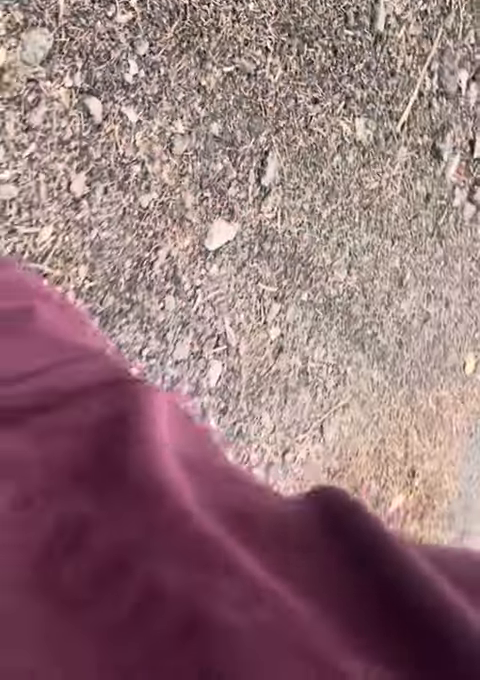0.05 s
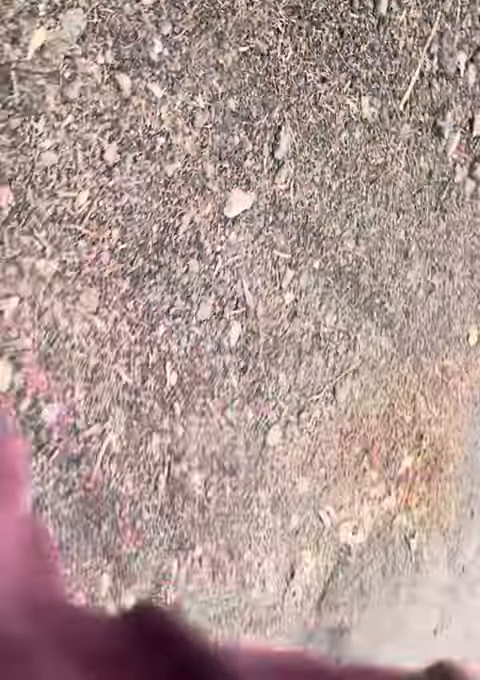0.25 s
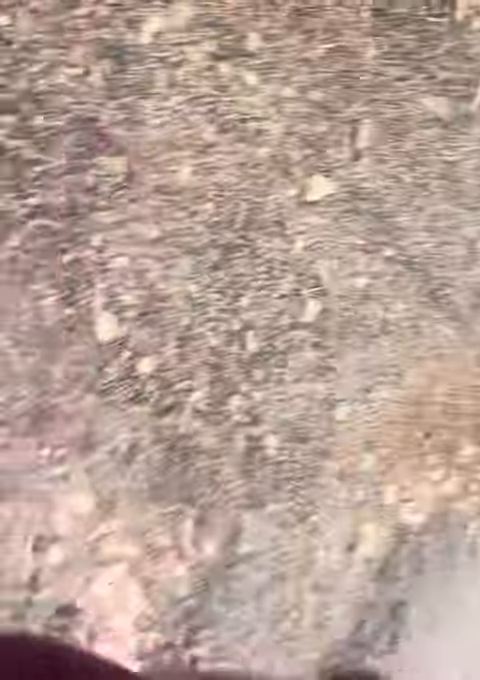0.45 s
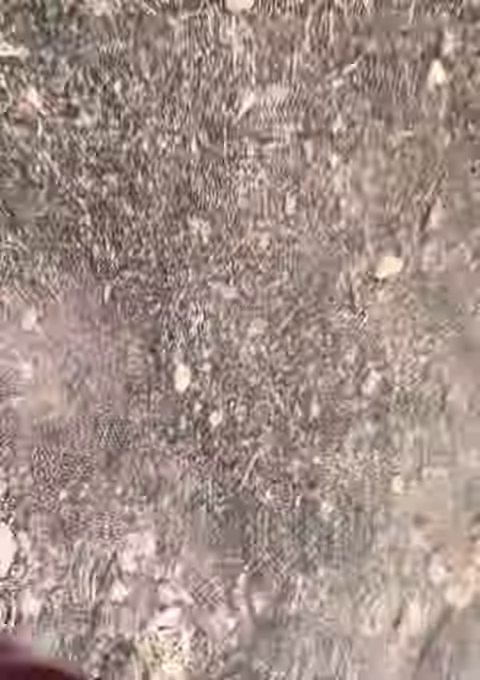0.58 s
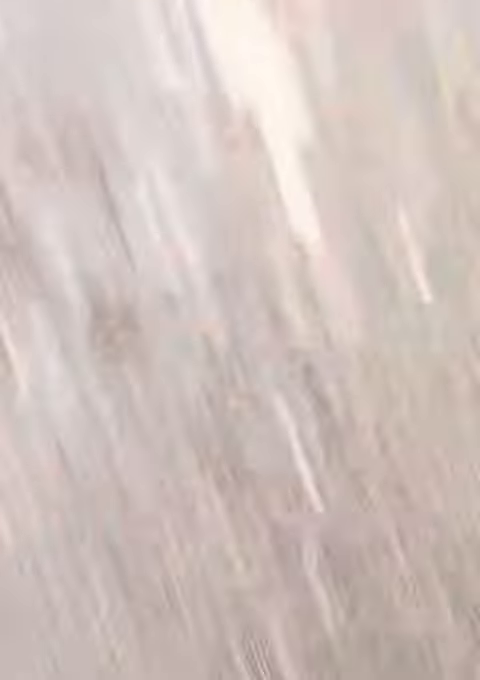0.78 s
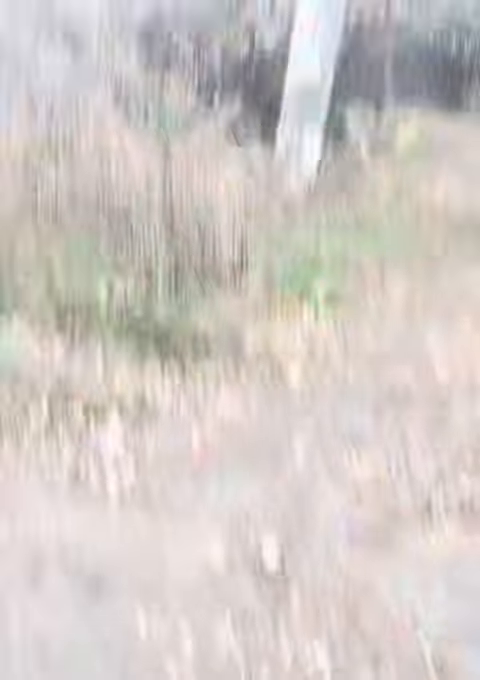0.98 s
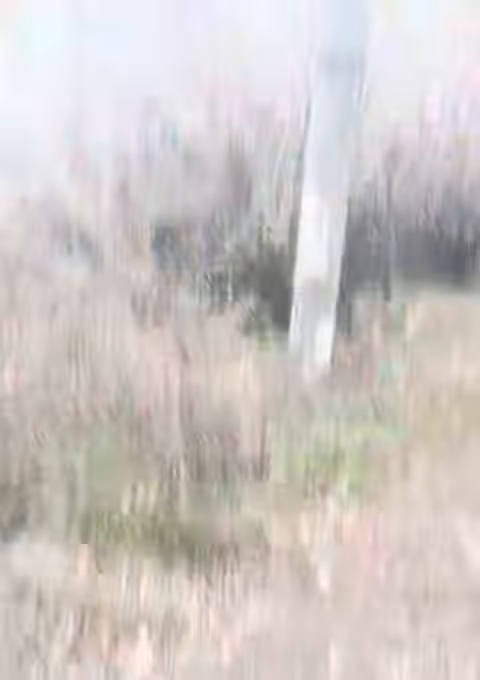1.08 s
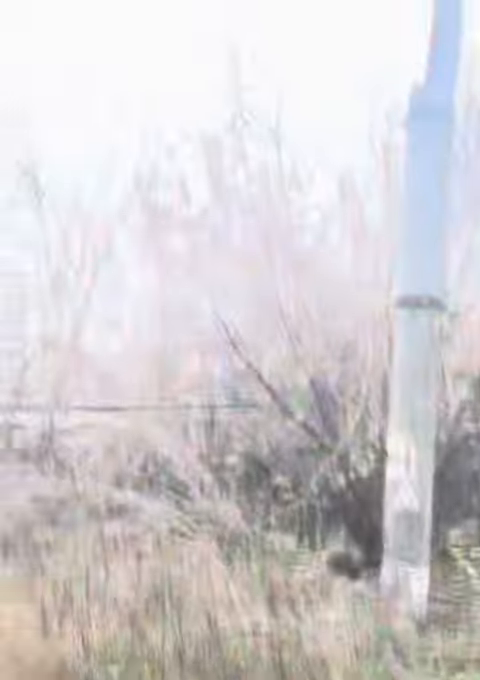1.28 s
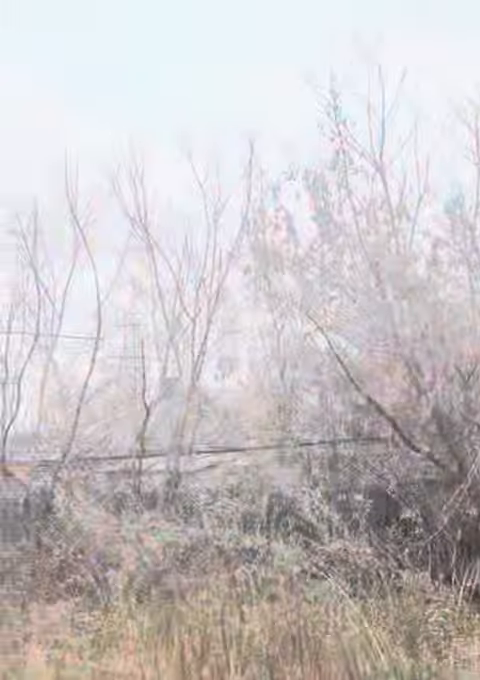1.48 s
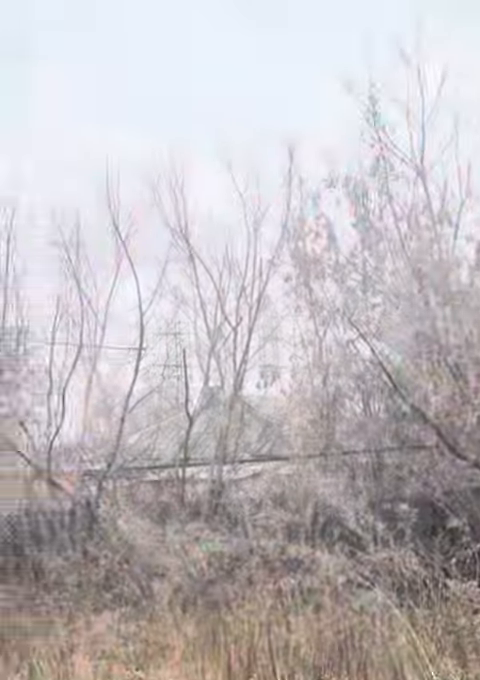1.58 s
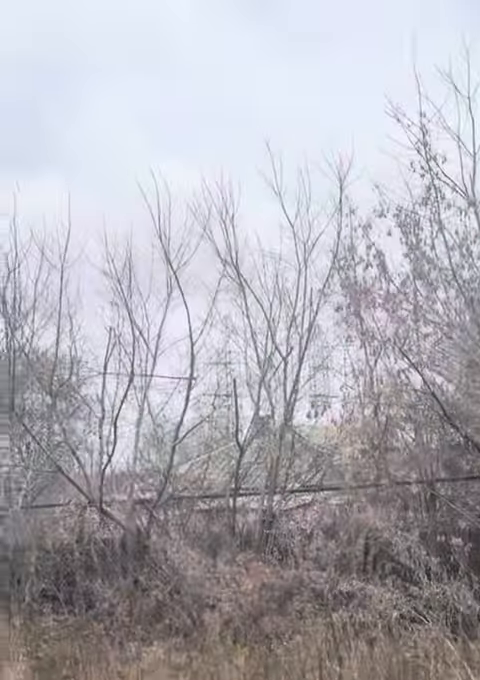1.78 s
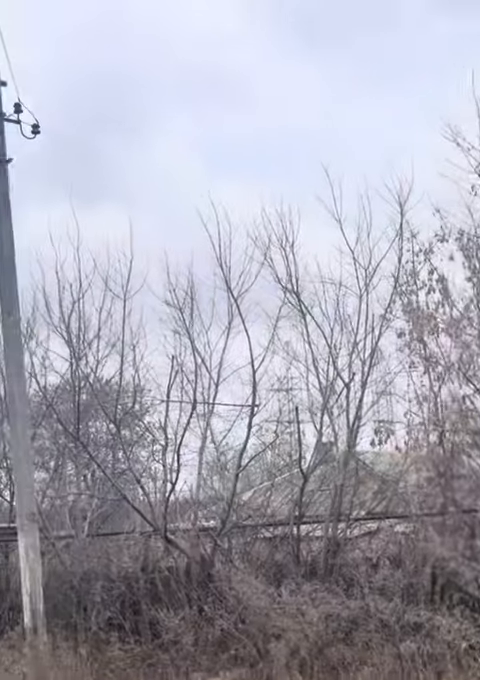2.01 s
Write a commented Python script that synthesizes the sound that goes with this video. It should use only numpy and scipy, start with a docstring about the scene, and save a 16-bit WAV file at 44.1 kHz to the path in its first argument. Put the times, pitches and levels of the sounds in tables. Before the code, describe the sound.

Deep dull blast outdoors, hard and sudden, followed by thunder-like rumbling echoes fading into the distance

```python
"""Still air, rustling clothing, ticks of grit and air turbulence at the microphones as someone turns round:
coloured noise in short envelopes. Then a heavy explosion far off in open country: band-limited pressure
pulses for a dull shock front and its first reflections, the snap of the recorder overloading, a short
decaying noise roar with brighter crackles, and low thunder of gliding noise that rolls away in lumps, with
a few separate echoes. The recorder's limiter ducks under the boom; close sounds go on after it."""
import sys
import numpy as np
from scipy import signal
from scipy.fft import rfft, irfft, next_fast_len
from scipy.io import wavfile
from scipy.ndimage import uniform_filter1d, minimum_filter1d

SR = 44100
rng = np.random.default_rng(int(sys.argv[2]) if len(sys.argv) > 2 else 0)


def wav_record(signal):
    """Record a signal, one row per channel, as 16-bit PCM in the file named by sys.argv[1]."""
    frames = np.transpose(np.atleast_2d(signal))
    bounded = np.clip(frames, -1, 1)
    # unit amplitude maps onto the largest positive 16-bit level
    quanta = np.round(bounded * 32767).astype(np.int16)
    wavfile.write(sys.argv[1], SR, quanta)


N = 90404
TIME = np.arange(N) / SR
BLAST_S, ATTACK_S = 0.2295, 0.012  # arrival of the explosion and its onset time, in seconds


def from_db(db):
    """Amplitude ratio: 20 dB is a factor of ten."""
    return 10 ** (np.asarray(db) / 20)


def rms_one(x):
    """Normalisation: scale to unit root-mean-square amplitude."""
    return x / np.sqrt(np.mean(x ** 2) + 1e-20)


def in_time(rows):
    """Linear interpolation of (time, value) rows over the scene."""
    return np.interp(TIME, *np.transpose(rows))


def at_hz(points, hz):
    """Logarithmic frequency axis: interpolate (frequency, value) rows along it."""
    table_hz, values = np.array(points).T
    return np.interp(np.log(hz), np.log(table_hz), values)


def band_pass(x, low_hz, high_hz):
    """Resonant selection: a causal Butterworth band-pass."""
    edges = [low_hz, min(high_hz, SR / 2 - SR / 20)]
    sos = signal.butter(2, edges, "band", fs=SR, output="sos")
    return signal.sosfilt(sos, x + 1e-18)


def drift(rate_hz):
    """Low-passed noise: a random wander of unit rms with a double pole at rate_hz."""
    step = 40  # samples between computed points
    pole = np.exp(-2 * np.pi * rate_hz * step / SR)
    noise = rng.standard_normal(N // step + 2002)
    slow = signal.lfilter([1], [1, -2 * pole, pole * pole], noise)[2000:]  # drop the settling time
    return np.interp(np.arange(N) / step, np.arange(len(slow)), rms_one(slow))


def swells(peak_s, rise_s, fall_s):
    """Exponential growth to a peak of 1, then exponential decay."""
    return np.exp(np.minimum((TIME - peak_s) / rise_s, (peak_s - TIME) / fall_s))


def evened(x, window_s):
    """Level normalisation: divide noise by its own smoothed rms."""
    span = max(int(window_s * SR), 2)
    power = uniform_filter1d(np.mean(x ** 2, axis=0), span)
    return x / np.sqrt(uniform_filter1d(power, span) + 1e-20)


# Phase between the two microphones: (frequency [Hz], lead of the left [rad])
LEFT_LEAD = [(120, 0.36), (330, -0.13), (560, -1.08), (1100, -1.11), (1600, -0.55), (2300, 1)]


def port_noise(spectrum, likeness, balance):
    """Interchannel coherence: mid and side noise mixed into a coloured stereo pair of unit rms."""
    size = next_fast_len(N)
    hz = np.maximum(np.fft.rfftfreq(size, 1 / SR), 1)
    mid, side = rfft(rng.standard_normal((2, size)))
    alike = np.clip(at_hz(likeness, hz), 0, 0.999)
    signs = np.array([[1], [-1]])  # left, right
    pair = np.sqrt(1 + alike) * mid + signs * np.sqrt(1 - alike) * side
    phase = np.exp(0.5j * signs * at_hz(LEFT_LEAD, hz))
    gain = from_db(0.5 * signs * at_hz(balance, hz))
    # Beyond either end of the spectrum the level falls 12 dB per octave
    low_skirt = np.minimum(hz / spectrum[0][0], 1) ** 2
    high_skirt = np.minimum(spectrum[-1][0] / hz, 1) ** 2
    colour = low_skirt * high_skirt * from_db(at_hz(spectrum, hz))
    return rms_one(irfft(pair * phase * gain * colour, size)[:, :N])


# Spectrum of still air: (frequency [Hz], relative level [dB per Hz])
AIR_SPECTRUM = [(25, -9), (55, 3.5), (110, -1.5), (200, -15), (1000, -24), (2000, -34), (4500, -41.5),
                (7000, -52), (10500, -51.5), (13000, -79)]
# Coherence of far sound and still air: (frequency [Hz], likeness [0 to 1])
FAR_LIKENESS = [(130, 1), (500, 0.95), (1500, 1), (2600, 0.071)]
# Stereo balance of far sound and still air: (frequency [Hz], left minus right [dB])
FAR_BALANCE = [(100, -1.5), (380, 1.5), (1100, -0.9), (2300, -0.5)]


def still_air(level_db=-45.5):
    """Stationary random noise: a steady coloured background."""
    return from_db(level_db) * port_noise(AIR_SPECTRUM, FAR_LIKENESS, FAR_BALANCE)


# Clothing strokes: (time of peak [s], rise [s], fall [s], relative level [dB])
RUSTLES = [(.06, 0.28, 0.3, -64), (0.213, 0.021, 0.016, -48.5), (0.684, 0.005, 0.014, -47),
           (0.756, 0.049, 0.052, -58), (0.949, 0.078, 0.11, -73.5)]
# Spectrum of rubbing fabric: (frequency [Hz], relative level [dB per Hz])
CLOTH_SPECTRUM = [(1500, -10), (3000, -7.5), (4500, 1), (6200, -5.5), (10500, -2.5), (12500, -9),
                  (15700, -4.5)]
# Neutral setting, as coherence or as balance: (frequency [Hz], likeness [0 to 1] or difference [dB])
UNLIKE = [(100, 0)]


def clothing(grain_db=4.5):
    """Sliding friction: grainy fabric noise under short stroke envelopes."""
    strokes = sum(from_db(db) * swells(s, rise, fall) for s, rise, fall, db in RUSTLES)
    fabric = port_noise(CLOTH_SPECTRUM, UNLIKE, UNLIKE)[0]
    grains = from_db(grain_db * drift(rate_hz=600))
    return strokes * rms_one(fabric * grains)


# Level of the low turbulence: (time [s], level [dB])
BUFFET_LEVEL = [(.2, -55), (.26, -40), (.6, -46), (.77, -37), (1.04, -38), (1.15, -58), (2.05, -56)]
# Spectrum of the low turbulence: (frequency [Hz], relative level [dB per Hz])
BUFFET_SPECTRUM = [(20, -5.5), (70, 0), (150, -6), (700, -38)]
# Puffs of air at the fastest part of the turn: (time of peak [s], level [dB])
PUFFS = [(.765, -27), (.83, -27), (1.005, -31.5)]
# Spectrum of a puff: (frequency [Hz], relative level [dB per Hz])
PUFF_SPECTRUM = [(150, 0), (240, -2.5), (420, -11.5), (800, -32)]


def buffeting(gust_db=1.5, puff_s=0.022):
    """Turbulent pressure: lumpy low noise and brief puffs, incoherent between the microphones."""
    gusts = from_db(gust_db * drift(rate_hz=64))
    turbulence = rms_one(port_noise(BUFFET_SPECTRUM, UNLIKE, UNLIKE) * gusts)
    low = from_db(in_time(BUFFET_LEVEL)) * turbulence
    puffs = sum(from_db(db) * swells(s, puff_s, puff_s) for s, db in PUFFS)
    return low + puffs * port_noise(PUFF_SPECTRUM, UNLIKE, UNLIKE)


# Ticks of grit, and at 0.2364 s the snap of the recorder overloading at the boom:
# (time [s], relative peak of the burst [dB], centre [Hz], burst decay [s])
TICKS = [(0.151, -45.5, 3900, 0.003), (.2364, -47, 4590, .0008), (0.7592, -30, 8630, 0.0012),
         (.764, -40, 7250, 0.0015), (0.787, -41, 8200, 0.00066), (0.792, -33, 9550, 0.0005),
         (0.8417, -41, 6700, 0.0007), (1.1385, -41.5, 5100, .0014), (1.476, -41, 4500, 0.0012),
         (1.483, -43.5, 4180, 0.0064)]


def ticks_and_snap(spread=1.5, ring_db=-14.5, ring_s=0.002):
    """Impulsive excitation: each tick or snap is a bright noise burst and a short decaying sine."""
    out = np.zeros(N)
    for s, db, hz, decay_s in TICKS:
        age = np.maximum(TIME - s, 0)
        burst = rng.standard_normal(N) * (TIME >= s) * np.exp(-np.minimum(age / decay_s, 20))
        tick = band_pass(burst, hz / spread, hz * spread)
        ring = np.sin(2 * np.pi * hz * age) * np.exp(-np.minimum(age / ring_s, 20))
        out += from_db(db) * (tick / np.abs(tick).max() + from_db(ring_db) * ring)
    return out


# Arrival difference between the microphones: (time [s], lead of the left microphone [s])
NEAR_LEAD = [(.22, 0.00022), (.68, 0.00012), (1.48, 0.000065)]


def close_by(x):
    """Time difference of arrival: the left microphone leads the right."""
    fine = signal.resample_poly(x, 4, 1)  # fourfold rate for delays finer than a sample
    right = np.interp(TIME - in_time(NEAR_LEAD), np.arange(4 * N) / (4 * SR), fine)
    return np.array([x, right])


def near_sounds(scatter_db=-5):
    """Partial coherence: cloth, ticks and snap as a shared part and an independent part per side."""
    direct, left, right = (clothing() + ticks_and_snap() for _ in range(3))
    both = close_by(direct) + from_db(scatter_db) * np.array([left, right])
    return both / np.hypot(1, from_db(scatter_db))


# Shock front and its echoes: (time [s], peak level before air loss [dB], centre [Hz])
FRONTS = [(0.2317, -1, 123.7), (0.2456, -2, 80.9), (.267, -4, 125), (0.2976, -3.5, 95.5), (.342, -9, 59.6),
          (.429, -7, 98.3), (.469, -9.5, 115.6), (0.529, -9, 102.4), (0.566, -11, 98.6), (0.681, -17.5, 70),
          (0.7199, -7, 67.7), (0.7834, -13.5, 105), (.836, -12.5, 71), (0.87, -15.5, 70),
          (0.997, -17.5, 101), (1.185, -15.5, 63.7), (1.218, -18, 77.5), (1.326, -26, 109),
          (1.99, -22, 104)]


def shock_fronts(spread=1.318, air_loss_hz=940):
    """Atmospheric absorption: pressure jumps become band-limited pulses, dulled by a low-pass."""
    out = np.zeros(N)
    for s, db, hz in FRONTS:
        jump = 1.0 * (np.arange(N) == int(s * SR))
        pulse = band_pass(jump, hz / spread, hz * spread)
        out -= from_db(db) * pulse / np.abs(pulse).max()
    return signal.sosfilt(signal.butter(3, air_loss_hz, fs=SR, output="sos"), out)


# Spectrum of the near scatter: (frequency [Hz], relative level [dB per Hz])
ROAR_SPECTRUM = [(25, -27.5), (45, -6), (70, -5.5), (98, 2), (150, -6), (230, -13), (330, -22), (520, -15),
                 (760, -25), (1000, -29.5), (2200, -52), (3200, -81)]
# Reverberation of the near scatter: (frequency [Hz], time to fall 60 dB [s])
ROAR_T60 = [(60, 1.76), (110, 1.11), (250, 0.95), (600, 0.46), (2000, 0.74)]
# Coherence of roar and crackle: (frequency [Hz], likeness [0 to 1])
ROAR_LIKENESS = [(240, 1), (400, 0.8), (750, 0.86), (1100, 0.12), (3000, 0.21)]
# Stereo balance of roar and crackle: (frequency [Hz], left minus right [dB])
ROAR_BALANCE = [(100, -1), (200, 2), (380, 1), (600, 0), (850, -7), (1150, -5.5), (1600, 0.5), (2300, 1)]


def roar(level_db=-7, hold_s=0.041, treble_swell_s=0.046, swell_from_hz=860):
    """Frequency-dependent reverberation: dense noise whose treble swells later and dies sooner."""
    noise = port_noise(ROAR_SPECTRUM, ROAR_LIKENESS, ROAR_BALANCE)
    noise = rfft(evened(noise, window_s=0.037))
    octave = np.log2(np.clip(np.fft.rfftfreq(N, 1 / SR), 60, 3840) / 60)
    age = np.maximum(TIME - BLAST_S, 0)
    out = 0
    for k in range(7):  # overlapping triangular octave bands
        hz = 60 * 2 ** k
        band = irfft(noise * np.maximum(1 - np.abs(octave - k), 0), N)
        treble = hz ** 2 / (hz ** 2 + swell_from_hz ** 2)
        attack = 1 - np.exp(-age / (ATTACK_S + treble * treble_swell_s))
        decay = from_db(-60 * np.maximum(age - hold_s, 0) / at_hz(ROAR_T60, hz))
        out = out + band * attack * decay
    return from_db(level_db) * out


# Brighter reflections off trees and buildings: (time of peak [s], level [dB], decay [s])
CRACKLES = [(.235, -24, 0.034), (0.265, -19.5, 0.026), (.298, -30, .038), (.414, -34.5, 0.016)]
# Spectrum of the crackles: (frequency [Hz], relative level [dB per Hz])
CRACKLE_SPECTRUM = [(300, 0.5), (550, 6.5), (950, 3), (1500, -10), (2400, -21), (3100, -35), (4500, -48)]


def crackle(grain_db=5.0, rise_s=0.003):
    """Diffuse reflection: ragged noise bursts, brighter than the boom around them."""
    bursts = sum(from_db(db) * swells(s, rise_s, decay_s) for s, db, decay_s in CRACKLES)
    noise = port_noise(CRACKLE_SPECTRUM, ROAR_LIKENESS, ROAR_BALANCE)
    return bursts * rms_one(noise * from_db(grain_db * drift(rate_hz=22)))


# Thunder's bass before lumps: (time [s], level [dB])
ROLL_BASS = [(.23, -24), (.4, -21.5), (.61, -29.5), (.74, -22), (.91, -22), (1.0, -27.5), (1.12, -24.5),
             (1.3, -30), (1.62, -36.5), (1.81, -36), (1.88, -29), (2.05, -34)]
# Thunder's middle before lumps: (time [s], level [dB])
ROLL_MIDDLE = [(.23, -30.5), (.6, -34), (.78, -33), (1.0, -34.5), (1.25, -36), (1.5, -40), (1.82, -42.5),
               (2.0, -40.5)]
# Glide of the bass: (time [s], pitch centre [Hz], of which only the ratios count)
ROLL_CENTRE = [(.45, 103.9), (.74, 76.28), (.88, 75.93), (1.06, 114.4), (1.18, 70), (1.3, 92.42),
               (1.73, 97.54), (1.85, 78.26)]
# Spectrum of the bass before the glide: (frequency [Hz], relative level [dB per Hz])
BASS_SPECTRUM = [(22, -28), (45, -7.5), (65, 3.5), (100, 0.5), (135, -4), (280, -33.5)]
# Spectrum of the middle: (frequency [Hz], relative level [dB per Hz])
MIDDLE_SPECTRUM = [(110, -9.5), (180, -0.5), (260, 0), (560, -9), (900, -17.5), (1400, -26), (2800, -51.5),
                   (4500, -72.5)]


def roll(lumps_db=1.0):
    """Superposed distant echoes: lumpy thunder, its bass read at varying speed to sink and lift."""
    arrived = np.clip((TIME - BLAST_S) / ATTACK_S, 0, 1)
    lumps = from_db(lumps_db * drift(rate_hz=16.0))
    travel = np.cumsum(in_time(ROLL_CENTRE))
    read_s = travel / travel[-1] * TIME[-1]
    steady = port_noise(BASS_SPECTRUM, FAR_LIKENESS, FAR_BALANCE)
    gliding = np.array([np.interp(read_s, TIME, channel) for channel in steady])
    bass = evened(gliding, window_s=0.046) * from_db(in_time(ROLL_BASS))
    middle = port_noise(MIDDLE_SPECTRUM, FAR_LIKENESS, FAR_BALANCE) * from_db(in_time(ROLL_MIDDLE))
    return arrived * (bass + middle) * lumps


def scene(left_db=0.42):
    """Linear superposition: close sounds, still air and an explosion slightly stronger on the left."""
    explosion = shock_fronts() + roar() + crackle() + roll()
    explosion = explosion * from_db([[left_db], [-left_db]])
    return still_air() + near_sounds() + buffeting() + explosion


def record(dry, limit_db=-0.8, attack_s=0.002, release_db_per_s=110, stop_hz=16800):
    """Look-ahead limiting: gain dips under the boom and recovers linearly in dB; the top is cut."""
    over = np.maximum(20 * np.log10(np.abs(dry).max(axis=0) + 1e-9) - limit_db, 0)
    release = release_db_per_s * TIME
    held = np.maximum.accumulate(over + release) - release
    span = max(int(attack_s * SR), 2)
    earlier = minimum_filter1d(-held, 2 * span)  # start the dip ahead of the peak
    gain_db = uniform_filter1d(uniform_filter1d(earlier, span), span)
    top_cut = signal.cheby2(12, 70, stop_hz, fs=SR, output="sos")
    return signal.sosfilt(top_cut, dry * from_db(gain_db))


dry = scene()
out = record(dry)
wav_record(out)
```